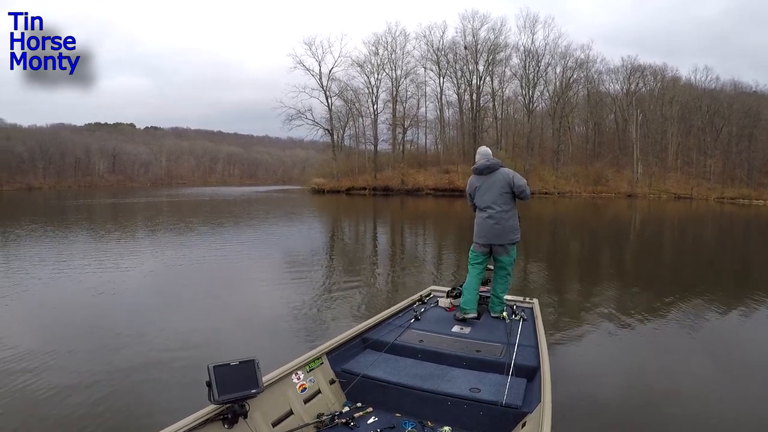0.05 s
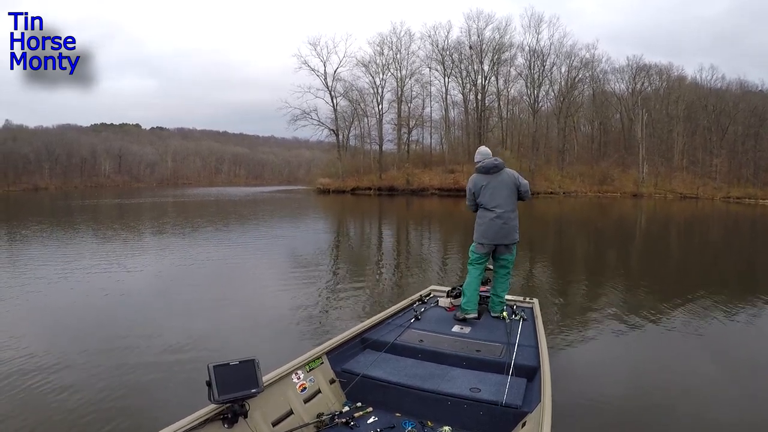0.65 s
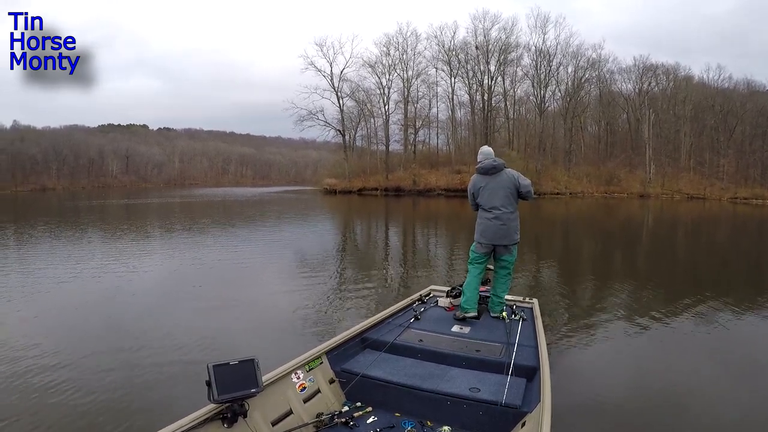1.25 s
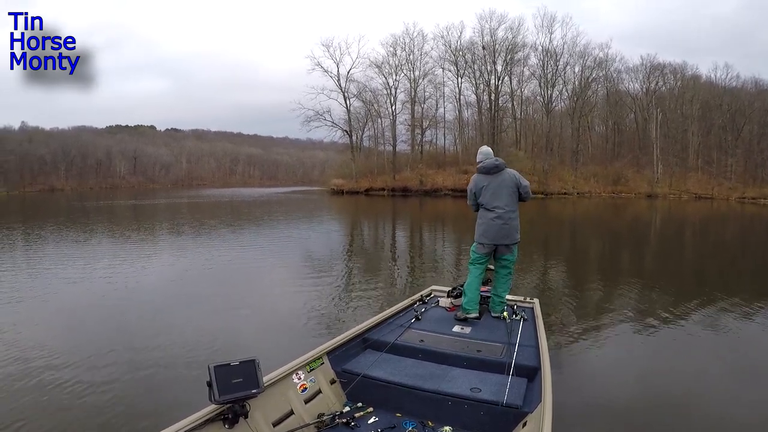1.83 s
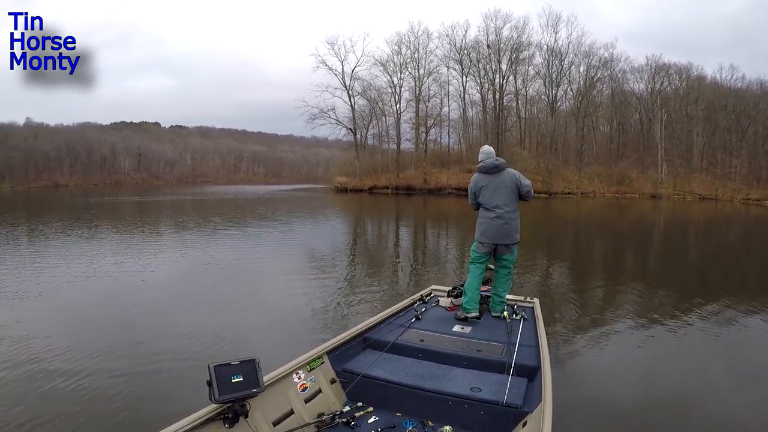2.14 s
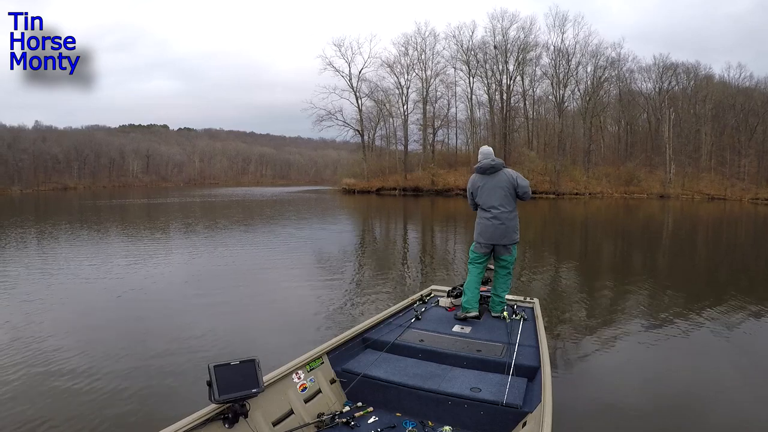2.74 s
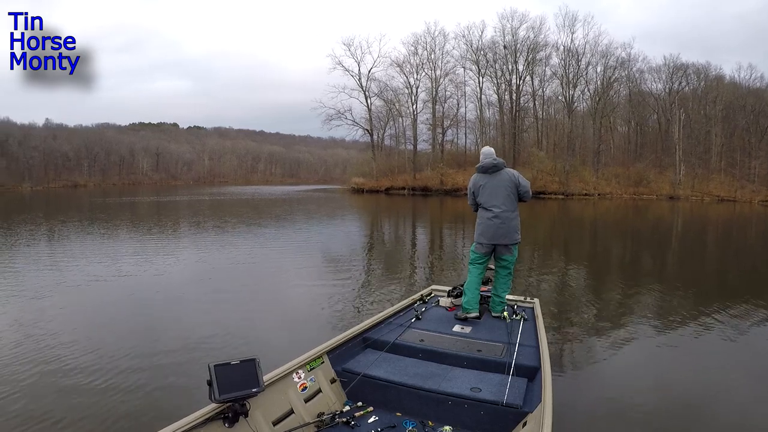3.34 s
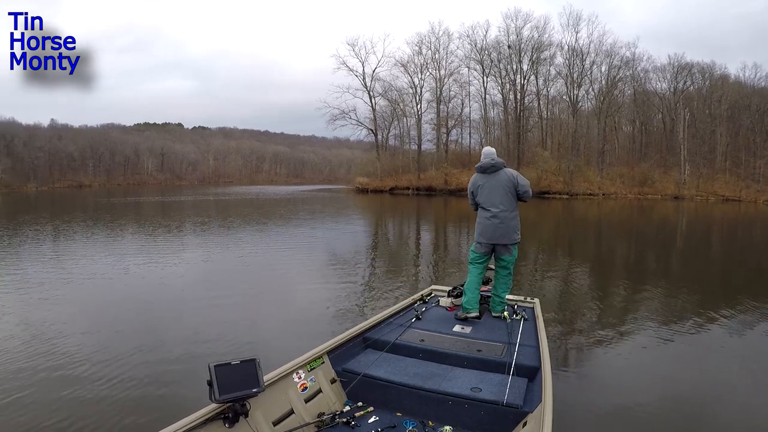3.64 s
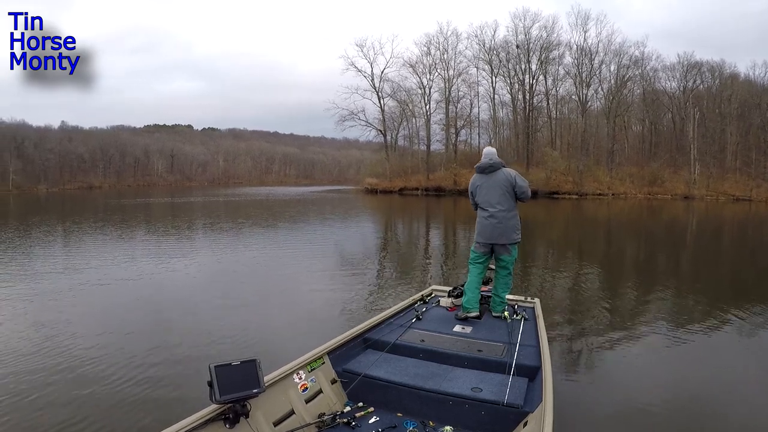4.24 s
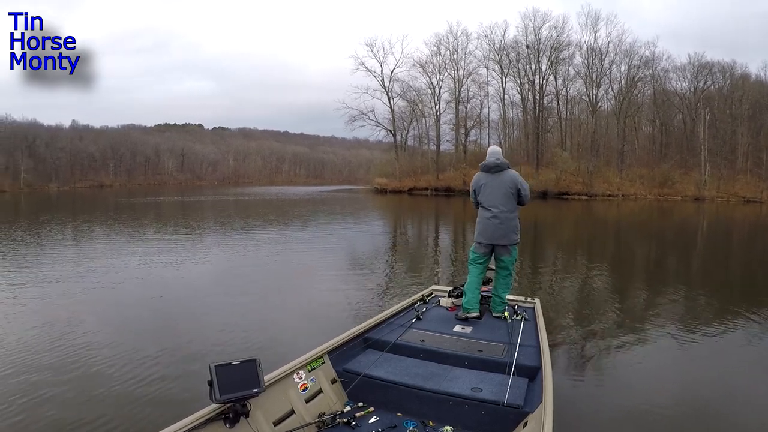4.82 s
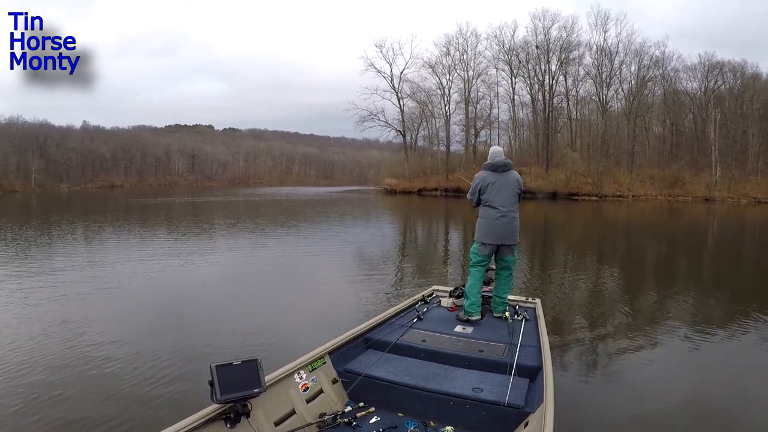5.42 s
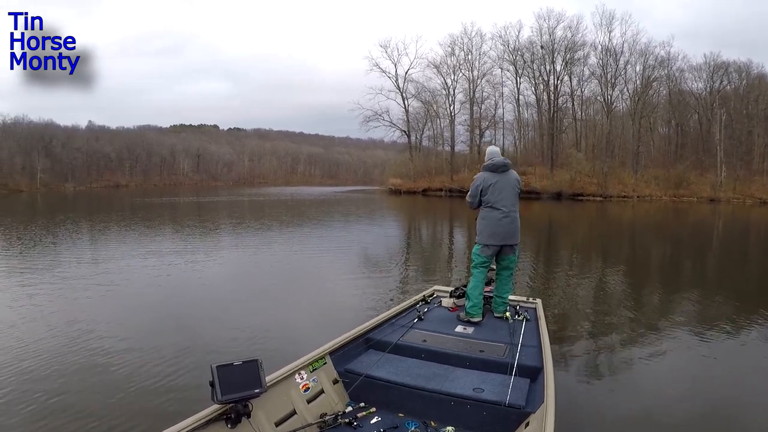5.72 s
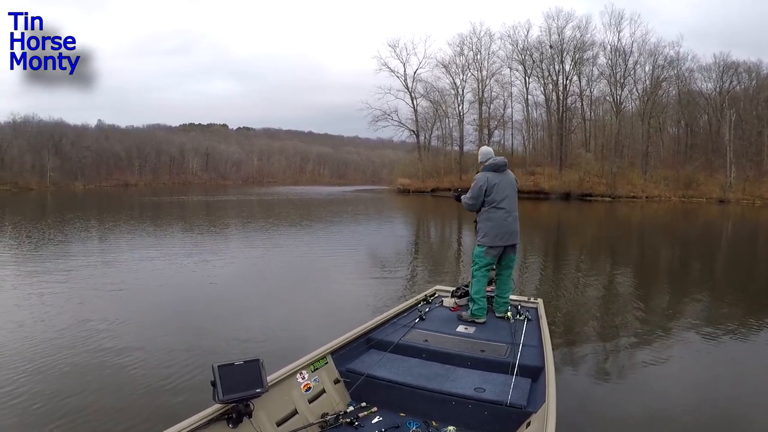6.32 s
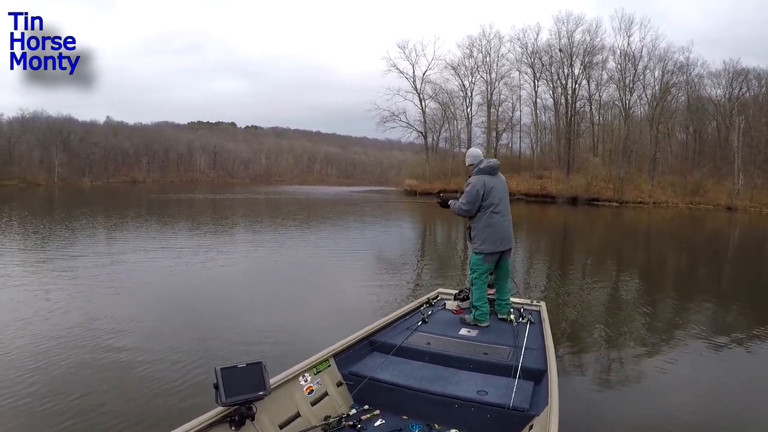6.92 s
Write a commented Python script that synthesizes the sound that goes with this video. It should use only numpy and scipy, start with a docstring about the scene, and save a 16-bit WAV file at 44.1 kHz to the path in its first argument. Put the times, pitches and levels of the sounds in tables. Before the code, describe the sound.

Water slaps hollowly on a metal boat as its electric motor's low hum swells, rising in pitch over a soft rumble.

```python
"""An electric trolling motor picks up speed under a metal fishing boat on a calm lake.
Its hum is made of harmonics (whole multiples of the shaft's turning rate), which swell as they slide
through the pitches the hull likes to ring at. A low drone sets in as the boat starts to move.
Water stirred by the propeller rumbles in the hull, and ripples lap and knock against it.
A few tiny ticks come and go, and a soft, wide noise and a faint hiss lie behind it all."""
import sys
import numpy as np
from scipy import signal
from scipy.fft import rfft, irfft, next_fast_len
from scipy.io import wavfile
from scipy.ndimage import map_coordinates

SR = 44100
rng = np.random.default_rng(int(sys.argv[2]) if len(sys.argv) > 2 else 0)


def wav_record(signal):
    """Record a signal, one row per channel, as 16-bit PCM in the file named by sys.argv[1]."""
    frames = np.transpose(np.atleast_2d(signal))
    bounded = np.clip(frames, -1, 1)
    # unit amplitude maps onto the largest positive 16-bit level
    quanta = np.round(bounded * 32767).astype(np.int16)
    wavfile.write(sys.argv[1], SR, quanta)


N = 307377
TIME = np.arange(N) / SR


def gain(db):
    """Turn decibels into a number to multiply a sound by."""
    return 10 ** (np.asarray(db) / 20)


def normalize(x):
    """Scale a signal so its average strength (rms) is 1."""
    return x / np.sqrt(np.mean(x ** 2) + 1e-20)


def level_at(points, hz):
    """Read between (frequency, level) points, with octaves evenly spaced."""
    freqs, levels = np.transpose(points)
    return np.interp(np.log(hz + 1), np.log(freqs + 1), levels)


def wobble(rate):
    """A smooth curve through `rate` random values a second."""
    coarse = TIME[::32]
    values = rng.standard_normal(int(N * rate / SR) + 4)
    return np.interp(TIME, coarse, map_coordinates(values, [coarse * rate]))


def filtered(x, response):
    """Turn each frequency in x up or down by the factor response(hz)."""
    size = next_fast_len(N + SR // 2)
    return irfft(rfft(x, size) * response(np.fft.rfftfreq(size, 1 / SR)), size)[..., :N]


def noise(colour):
    """Noise of strength 1; its colour says how strong the low and high parts are."""
    return normalize(filtered(rng.standard_normal(N), lambda hz: gain(level_at(colour, hz))))


def swell(time, width):
    """A bell-shaped rise and fall around the given time."""
    return np.exp(-.5 * ((TIME - time) / width) ** 2)


def bumps(rows):
    """Add up brief rises and dips into one curve in decibels."""
    return sum(db * swell(time, width) for time, width, db in rows)


def tone(hz, drift=0):
    """A pure tone that follows a pitch curve; drift nudges the wave early or late, in radians."""
    return np.sqrt(2) * np.sin(2 * np.pi * (np.cumsum(hz) / SR + rng.random()) + drift)


def under_way():
    """How far the boat has got moving, from 0 at rest to 1."""
    gather_s = 1.54
    return np.clip((TIME - MOVE_OFF_S) / gather_s, 0, 1) ** 1.29


# soft noise that is the same in both ears: (frequency [Hz], level [dB])
CENTRE_COLOUR = [(20, -1.5), (60, 2.5), (120, 2), (500, 1), (1000, -2), (2000, -7), (3500, -11.5),
                 (5000, -19), (8000, -32)]
# a soft, very wide noise in the middle pitches, opposite in the two ears: (frequency [Hz], level [dB])
WIDE_COLOUR = [(40, -22), (90, -19), (160, 7), (260, 6), (400, 2), (850, 1), (1300, -4.5), (2000, -12),
               (3000, -19), (4200, -33), (6000, -35)]
# thin hiss: (frequency [Hz], left level [dB], right level [dB])
HISS_COLOUR = [(2000, -29, -19), (3870, -3.5, -5.5), (5000, -3.5, -4), (5650, -1, 3.5), (5770, 3.5, 7),
               (6400, -3.5, -0.5), (7230, 2, 1), (8130, -2.5, -1.5), (9930, -1.5, 0.5), (11300, -4.5, -6.5),
               (12400, -7, -7.5), (13900, -11.5, -13.5), (15500, -16, -21)]
def background():
    """Soft noise, very wide in the middle pitches, and a thin hiss that is stronger on the right."""
    centre = gain(-58) * noise(CENTRE_COLOUR)
    wide = gain(-49) * noise(WIDE_COLOUR)
    left = gain(-62) * noise([(hz, db) for hz, db, _ in HISS_COLOUR])
    right = gain(-59) * noise([(hz, db) for hz, _, db in HISS_COLOUR])
    return np.array([centre + wide + left, centre - wide + right])


# light ticks: (time [s], level [dB])
TICK_EVENTS = [(1.8513, -44), (1.8695, -43), (1.893, -42.5), (1.929, -44)]
# faint, grainy rustles: (time [s], width [s], level [dB])
RUSTLE_EVENTS = [(1.885, .035, -71.5), (4.9, 0.093, -71), (6.325, 0.028, -66.5)]
# the bright colour of both: (frequency [Hz], level [dB])
BRIGHT = [(1500, -35), (4000, 3), (6000, 0), (9000, -16), (14000, -45)]
def ticks():
    """A quick run of tiny clicks, each a snap with a short fizzy tail, and a few faint rustles."""
    fade_s = .03
    snaps = sum(gain(db + 12.5) * signal.unit_impulse(N, round(time * SR)) for time, db in TICK_EVENTS)
    tails = sum(gain(db - 16.5 - 60 * np.abs(TIME - time) / fade_s) * (TIME >= time)
                for time, db in TICK_EVENTS)
    grain = normalize(gain(5 * wobble(300)))
    rustle = grain * sum(gain(db) * swell(time, width) for time, width, db in RUSTLE_EVENTS)
    fizz = noise(BRIGHT) + .5 * np.array([noise(BRIGHT), noise(BRIGHT)])
    return filtered(snaps, lambda hz: gain(level_at(BRIGHT, hz))) + (tails + rustle) * fizz


# ripples washing along the hull: (time [s], width [s], slosh level [dB], spray level [dB])
RIPPLES = [(0.2, 0.027, -42.5, -58), (.43, 0.046, -56, -65), (0.667, 0.0088, -56, -57),
           (0.69, 0.028, -41.5, -59), (1.58, 0.015, -54, -74), (1.88, 0.04, -39.5, -60),
           (4.82, 0.064, -44.5, -78), (4.99, 0.045, -43.5, -63), (6.325, 0.042, -46.5, -56)]
# the low slosh and the bright spray: (frequency [Hz], level [dB])
SLOSH_COLOUR = [(50, -60), (110, -21), (170, 8.5), (260, 1), (350, 1), (430, -5), (520, -2.5), (650, -19),
                (760, -29), (1000, -51), (4000, -100)]
SPRAY_COLOUR = [(100, -42), (600, -1), (1000, 0.5), (1450, 0), (2150, -3), (2700, -11), (4600, -15),
                (7000, -38), (12000, -75)]
def laps():
    """Each ripple sloshes in the hull and throws a little grainy spray on both sides."""
    slosh = sum(gain(db) * swell(time, width) for time, width, db, _ in RIPPLES)
    spray = sum(gain(db) * swell(time, width) for time, width, _, db in RIPPLES)
    water = noise(SLOSH_COLOUR) + gain(-7) * np.array([noise(SLOSH_COLOUR), noise(SLOSH_COLOUR)])
    drops = np.array([noise(SPRAY_COLOUR), noise(SPRAY_COLOUR)]) * normalize(gain(3.4 * wobble(200)))
    return slosh * water + spray * drops


# water slapping the hull: (time [s], pitch [Hz], thud level [dB], fade time [s], ring level [dB])
SLAPS = [(.170, 520, -31, 0.013, -41), (0.206, 400, -22.5, 0.02, -46), (0.221, 215, -17.5, 0.023, -43),
         (.26, 270, -24, 0.024, -50), (.389, 326, -24, 0.018, -49), (0.415, 395, -33, 0.016, -49),
         (.461, 413, -26.5, 0.029, -52), (0.657, 530, -30, 0.0078, -39.5), (0.671, 347, -22, 0.027, -42),
         (0.683, 345, -26, 0.024, -45), (.707, 280, -19.5, .022, -44), (1.567, 366, -21, 0.022, -48),
         (4.775, 335, -30, 0.039, -52)]
# the notes the hull rings with afterwards: (pitch [Hz], level [dB], fade time [s])
HULL_NOTES = [(165, 2, 0.11), (315, -6, 0.085), (347, -1, 0.14), (482, -6.5, 0.22), (524, -11.5, 0.2),
              (616, -24, 0.14), (754, -17.5, 0.22), (1060, -20, 0.16), (1385, -16.5, 0.14),
              (1730, -18.5, 0.16), (2120, -18.5, 0.14)]
def knocks():
    """Each slap makes a hollow thud and leaves the hull ringing until the water damps it."""
    age = np.arange(SR // 5) / SR
    onset = 1 - np.exp(-age / .0017)

    def fading(hz, db, fade_s):
        """A tone that drops 60 dB in its fade time."""
        return gain(db - 60 * age / fade_s) * np.sin(2 * np.pi * hz * age)

    out = np.zeros(N)
    for time, hz, db, fade_s, ring_db in SLAPS:
        ring = sum(fading(pitch, level + 2 * rng.standard_normal(), fade)
                   for pitch, level, fade in HULL_NOTES)
        out[round(time * SR):][:len(age)] += onset * (fading(hz, db, fade_s) + gain(ring_db) * ring)
    band_hz = (160, 1700)  # thin panels give off no deep bass
    return signal.sosfilt(signal.butter(4, band_hz, "band", fs=SR, output="sos"), out)


# the deep rumble and the lighter churn: (frequency [Hz], level [dB])
RUMBLE_COLOUR = [(60, -36), (108, -32.5), (125, -19), (145, -1.5), (172, -2.5), (200, -3.5), (235, -5),
                 (290, -9.5), (330, -21), (400, -25), (600, -47), (1500, -120)]
CHURN_COLOUR = [(100, -56), (200, -31), (280, -3), (345, 0.5), (400, -4.5), (460, -8), (530, -17),
                (620, -22.5), (800, -35.5), (3000, -100)]
def wash():
    """Swirling water from the propeller shakes the hull, a little louder once the boat moves."""
    rumble_db = -41.5 + 3 * under_way() + 0.066 * bumps(LOAD_SURGES) + 1.7 * wobble(3.045)
    rumble = gain(rumble_db) * noise(RUMBLE_COLOUR)
    churn_db = -49 + 2 * under_way() + 0.3 * wobble(1.9) + 0.83 * wobble(25)
    return rumble + gain(churn_db) * noise(CHURN_COLOUR)


# hull panels singing briefly: (start [s], length [s], multiple of the shaft speed, level [dB])
PANEL_MOANS = [(1.381, 0.083, 20, -38.5), (1.652, 0.116, 20, -38.5), (1.724, 0.068, 16, -40),
               (1.725, 0.16, 30, -53), (2.604, 0.11, 16, -43), (2.703, 0.093, 25, -48),
               (4.02, 0.043, 11, -36), (4.082, 0.051, 16, -41), (4.415, 0.071, 20, -49),
               (4.885, 0.061, 13, -48), (5.103, 0.25, 16, -48.5), (5.16, 0.18, 11, -46),
               (5.471, 0.19, 16, -43), (5.52, 0.4, 13, -42.5), (5.657, .25, 11, -46),
               (5.79, 0.33, 16, -44.5), (6.45, 0.16, 13, -44), (6.54, 0.067, 16, -41.5)]
def moans():
    """A hull panel picks up one shaft harmonic: it swells, holds with a rough flutter and fades."""
    rise_s, fall_s = 0.0081, 0.014
    angle = shaft_angle()
    flutter = 1 + 0.18 * wobble(50)
    drift = 0.31 * wobble(45)
    out = np.zeros(N)
    for start, length, multiple, db in PANEL_MOANS:
        rise = (1 + np.tanh((TIME - start) / rise_s)) / 2
        fall = (1 - np.tanh((TIME - start - length) / fall_s)) / 2
        out += gain(db) * rise * fall * harmonic(angle, multiple, drift)
    return flutter * out


MOVE_OFF_S = 2.3  # the boat starts to move
# the drone swells or falters briefly: (time [s], width [s], level change [dB])
DRONE_CHANGES = [(3.13, .04, 4.5), (3.26, 0.026, -33), (3.42, 0.032, -9), (3.57, 0.019, 1),
                 (3.72, 0.018, -8), (4.23, .05, 2.5), (4.96, 0.046, -9.5), (5.36, .018, 5),
                 (5.415, .016, -17), (5.47, 0.014, 4.5), (5.67, .025, -7.5), (6.01, 0.011, -13),
                 (6.47, 0.015, 5.5), (6.87, 0.075, -2)]
def drone():
    """A low drone sets in as the boat moves, throbbing and creeping up in pitch and level."""
    age = TIME - MOVE_OFF_S
    pitch_hz = 154.1 + 2.6 * age
    level_db = -34.5 + 0.93 * age + 0.93 * bumps(LOAD_SURGES) + bumps(DRONE_CHANGES)
    throb_hz = 11 + 2.97 * wobble(8)
    throb = 1 + .22 * tone(throb_hz) + 0.2 * wobble(26)
    return under_way() * gain(level_db) * throb * tone(pitch_hz, drift=0.21 * wobble(26))


# the shaft spins up, sags once, then climbs to cruising speed: (time [s], speed [turns per s])
SPIN_UP = [(0, 12.5), (1.2, 13), (1.85, 15.3), (2.12, 17.4), (2.5, 17.95), (2.65, 19.2), (2.93, 18),
           (3.12, 19.7), (3.8, 22.1), (4.3, 22.6), (5, 22.65), (6.97, 23.4)]
def shaft_speed():
    """How fast the shaft turns at each moment, in turns per second."""
    times, speeds = np.transpose(SPIN_UP)
    return np.interp(TIME, times, speeds)


def shaft_angle():
    """How far the shaft has turned, in radians."""
    return 2 * np.pi * np.cumsum(shaft_speed()) / SR


def harmonic(angle, multiple, drift):
    """A pure tone that swings `multiple` times for each turn of the shaft."""
    smear = .52 * (multiple - 14) ** 2  # the hull spreads each turn's pulse out in time
    return np.sqrt(2) * np.cos(multiple * angle + smear + drift)


# the propeller works harder or eases off: (time [s], width [s], level change [dB])
LOAD_SURGES = [(2.2, 0.14, 2), (2.53, 0.071, 4), (3.53, 0.049, 1.5), (3.8, 0.087, -1.5), (4.5, 0.2, -4),
               (5.72, 0.17, 1.5)]
# how well the hull turns the motor's shaking into sound: (frequency [Hz], level [dB])
HULL_RESPONSE = [(110, -36), (140, -22), (160, -5.5), (185, 0.5), (195, -21), (215, -5.5), (229, 1),
                 (270, 1), (285, -2.5), (298, -9), (340, -19), (367, -10), (395, -23.5), (460, -33),
                 (600, -10.5), (1000, -60)]
# the tones in the hum: (multiple of the shaft speed, level [dB], flutter [dB])
HUM_TONES = [(8, -3, 1.5), (11, -5, 0), (13, -1, 1), (15, -1, 1), (16, -5, -0.5), (18, 0, -0.5),
             (19, -3, 3.5), (20, -2, 2)]
def motor():
    """The motor shakes the hull; each harmonic swells as it passes a pitch the hull rings at."""
    grip_speed, cruise_speed = 17.8, 20.5  # turns per second
    speed = shaft_speed()
    # the hum grows with speed until the propeller grips the water
    load_db = -36.5 - 4 * np.maximum(grip_speed - speed, 0) + bumps(LOAD_SURGES)
    angle = shaft_angle() + 0.0031 * wobble(15)  # the shaft turns a little unsteadily
    # faster water makes each harmonic flutter and waver more
    swirl = (speed / cruise_speed) ** 4
    hum = np.zeros(N)
    for multiple, db, flutter_db in HUM_TONES:
        hull_db = level_at(HULL_RESPONSE, multiple * speed)
        level = gain(db + hull_db + swirl * flutter_db * wobble(9))
        roughness = 1 + swirl * .24 * wobble(45)
        hum += level * roughness * harmonic(angle, multiple, drift=swirl * .29 * wobble(22))
    # a slightly unbalanced propeller drags on the motor once a turn, most of all as it grips
    chug_depth = .45 / (1 + ((speed - grip_speed) / 0.47) ** 2)
    chug = 1 - chug_depth * np.sin(angle)
    return gain(load_db) * chug * hum


def scene():
    """The hull sounds from ahead, a touch to the right, with ripples, ticks and soft noise around it."""
    hull = motor() + drone() + wash() + knocks() + moans()
    return hull * gain([[-.2], [.2]]) + laps() + ticks() + background()


def record(dry):
    """Cut away the very highest treble."""
    return filtered(dry, lambda hz: hz < 14950)


dry = scene()
out = record(dry)
wav_record(out)
```